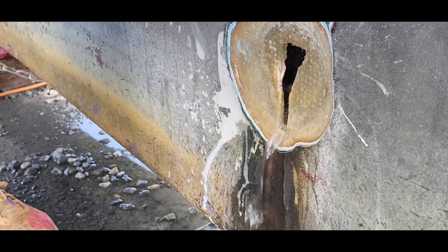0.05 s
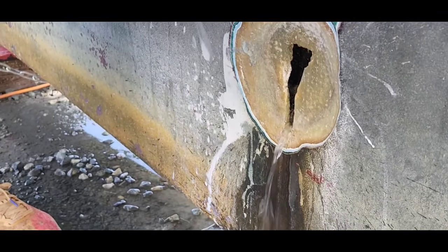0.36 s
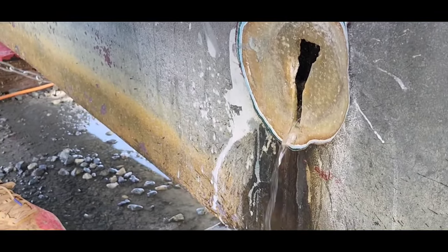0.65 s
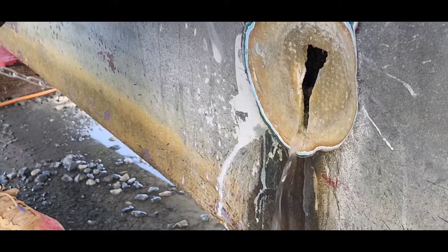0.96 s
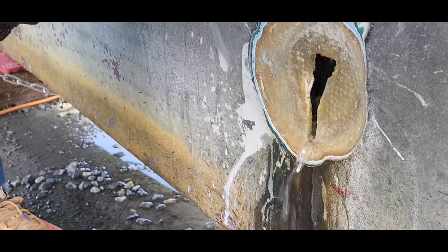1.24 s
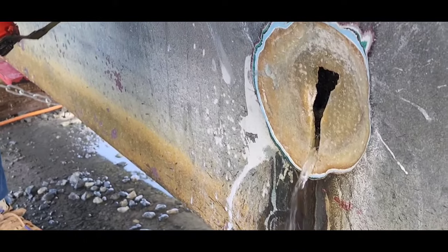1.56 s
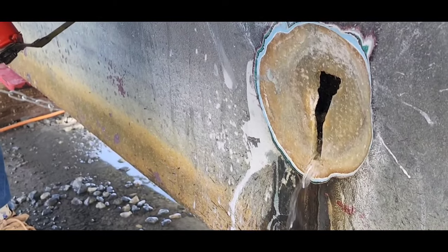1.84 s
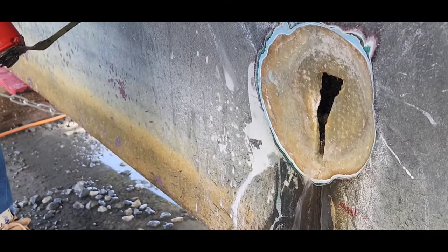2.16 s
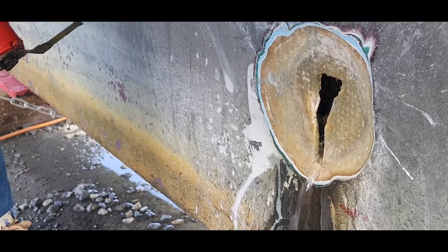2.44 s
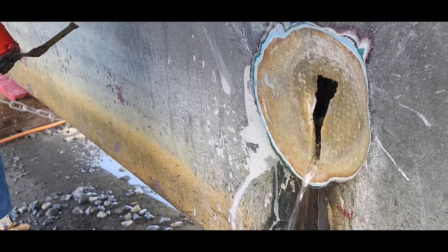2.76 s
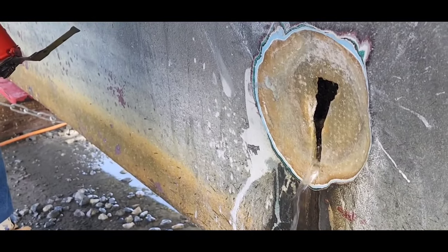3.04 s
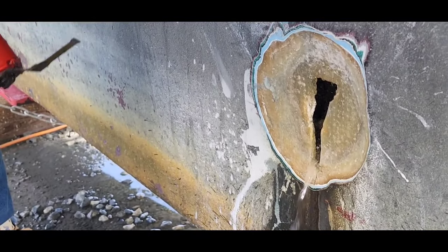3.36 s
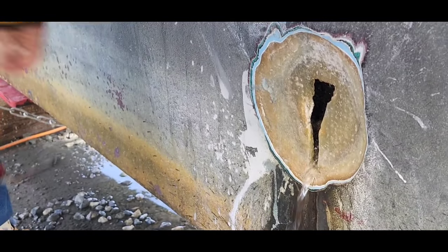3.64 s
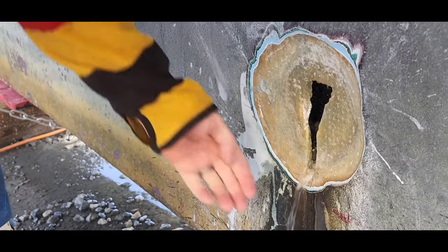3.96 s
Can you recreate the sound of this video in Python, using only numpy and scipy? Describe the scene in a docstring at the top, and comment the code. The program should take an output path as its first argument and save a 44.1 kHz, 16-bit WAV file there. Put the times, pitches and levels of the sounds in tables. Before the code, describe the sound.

Close up and outdoors, water drips in quick, uneven ticks onto gravel, some drops smacking on stone or plinking in a puddle. Behind it runs a steady machine hum and rumble, with a soft thump and faint sleeve rustle late.

```python
"""Keel water on wet gravel

Outdoors, water trickles from a hole in a boat's keel and spatters on wet gravel. Each drop bursts
into spray and a few tiny ringing bubbles; heavy ones smack on stone, others plink in a puddle.
Behind it a machine hums steadily over a low, uneven rumble and faint air.
Near the end come one soft low bump and the brush of a sleeve."""
import sys
import numpy as np
from scipy import signal
from scipy.io import wavfile
from scipy.ndimage import uniform_filter1d

SR = 44100
rng = np.random.default_rng(int(sys.argv[2]) if len(sys.argv) > 2 else 0)


def wav_out(sig):
    """Save sig, one row per channel (or a flat mono array), as 16-bit PCM at SR to the path in sys.argv[1]."""
    wavfile.write(sys.argv[1], SR, np.round(np.clip(np.atleast_2d(sig).T, -1, 1) * 32767).astype(np.int16))


N = 176400

# Swell of the rumble: time_s, level_db
RUMBLE_SWELL = [(0, -49), (.6, -46.5), (1.1, -47), (1.7, -45.5), (2.3, -45.5), (3, -40), (3.3, -44.5),
                (4, -40)]
# Tone of the rumble: frequency_hz, gain_db
RUMBLE_EQ = [(15, -5.5), (30, -17), (52, 4), (85, -1.5), (125, -5), (180, -21), (300, -35), (800, -56)]
# Tone of the outdoor air: frequency_hz, gain_db
AIR_EQ = [(200, 0), (450, -2.5), (800, -5.5), (1100, -12), (2500, -24.5), (16000, -39)]
# Harmonics of the machine's pulse rate, from the first up: gain_db
HUM_HARMONICS = [-3, 1, -6, -13, -10.5, -12.5, -9.5, -12.5, -15.5, 0.5, -5.5, -9.5, -17.5, -14.5, -21]
# Fade-in of the sleeve: time_s, level_db
SLEEVE_FADE = [(3.5, -81), (3.63, -57.5), (4, -54.5)]
# Tone of the brushing cloth: frequency_hz, gain_db
SLEEVE_EQ = [(700, -13), (2400, -3.5), (7000, -18)]
# Flow of the trickle between the large drops: time_s, level_db
TRICKLE_FLOW = [(0, -53), (.6, -53.5), (1.3, -51.5), (1.56, -54), (2.05, -57.5), (3.0, -53.5), (3.55, -56),
                (3.7, -53.5), (4, -55)]
# Tone of the trickle's wash: frequency_hz, gain_db
WASH_EQ = [(700, -13.5), (1200, 2.5), (1550, 7), (1900, 0.5), (3300, 2), (4500, -2.5), (5700, 6.5),
           (7200, 0), (9300, -16), (12000, -8.5), (15500, -2.5)]
# Drops into the puddle: start_s, level_db, pitch_hz
PUDDLE_DROPS = [(0.136, -51, 3520), (0.3755, -49.5, 1584), (.413, -49, 1660), (0.586, -41, 1625),
                (0.613, -52, 1640), (0.729, -50.5, 1526), (0.78, -47.5, 1530), (1.092, -42.5, 1550),
                (1.265, -50, 1210), (1.273, -37, 2865), (1.302, -49, 1660), (2.143, -55, 1550),
                (2.784, -57, 1543), (2.891, -50.5, 1544), (2.923, -52, 1550), (3.042, -46, 1360),
                (3.176, -54, 1495), (3.361, -54.5, 1540), (3.601, -52, 1540), (3.656, -48, 1520),
                (3.677, -37, 1514)]
# Heavy drops on stone: start_s, level_db, high_cut_hz
STONE_DROPS = [(0.264, -44, 5300), (0.584, -40.5, 4320), (0.7433, -35, 6000), (0.9058, -38.5, 7000),
               (1.2629, -35, 3170), (1.2733, -42, 3300), (1.975, -48, 3000), (2.367, -38.5, 6200),
               (2.4925, -48, 2170), (2.6436, -35, 6400), (3.0452, -36, 4070)]
# A sharp smack with two quick echoes off the ground and hull: delay_s, gain_db
SMACK_ARRIVALS = [(0, -0.5), (.0038, -0.5), (.0063, -7)]
# Tone of the spray: frequency_hz, gain_db
SPRAY_EQ = [(300, -5), (900, -3.5), (1600, -4), (2300, 2), (4000, 4.5), (6500, 11.5), (9500, 1), (12500, 9),
            (15500, 4.5)]
# Large drops on gravel: start_s, bubbles_db, bubble_pitch_hz, spray_db
GRAVEL_DROPS = [(0.0389, -41, 5120, -65), (0.3408, -42, 2930, -52), (0.364, -63, 6000, -47),
                (0.399, -41, 6200, -51.5), (0.5434, -42.5, 2590, -51), (0.5537, -39, 7400, -67),
                (0.583, -42.5, 3700, -71), (0.6458, -44, 6970, -50), (0.6833, -40.5, 4920, -50),
                (0.7205, -37.5, 6280, -46), (0.744, -36, 5000, -48), (0.7725, -43, 6800, -47.5),
                (0.782, -43.5, 3600, -51), (0.796, -42.5, 6400, -47), (0.841, -45, 6300, -49),
                (0.904, -32, 5640, -44.5), (0.9921, -42, 6360, -44), (1.0051, -36.5, 6400, -42),
                (1.0592, -41.5, 4180, -48), (1.1314, -41, 6540, -56), (1.2181, -53, 5600, -46.5),
                (1.233, -41.5, 3040, -45), (1.2729, -35.5, 2740, -41.5), (1.3027, -37, 6360, -59),
                (1.3616, -41.5, 6070, -55), (1.3901, -44, 6150, -47.5), (1.41, -44, 7000, -44),
                (1.4264, -38, 5420, -47), (1.832, -43.5, 5940, -52.5), (1.9371, -51.5, 3630, -49),
                (1.9508, -37.5, 6840, -41), (2.1121, -37, 5780, -50.5), (2.1302, -40.5, 4050, -46),
                (2.1697, -42.5, 6350, -44.5), (2.2697, -46, 6360, -49), (2.3134, -38, 5640, -74),
                (2.5729, -46, 6850, -48.5), (2.6112, -45, 6170, -53), (2.6527, -36, 6380, -71),
                (2.8424, -41.5, 4630, -46), (2.853, -47, 6960, -44), (3.2286, -41.5, 6600, -48.5),
                (3.4005, -37.5, 6230, -46), (3.4752, -42, 7700, -59), (3.77, -44, 4870, -55)]

SPLAT_RISE_S, SPLAT_HOLD_UNTIL_S, SPLAT_DECAY_S = .003, .0075, .0032
WATER_PAN_DB = -5  # negative leans right


def amp(db):
    """Decibels to gain."""
    return 10 ** (np.asarray(db) / 20)


def unit(x):
    """Scales to rms 1."""
    return x / np.sqrt(np.mean(x ** 2) + 1e-20)


def match_energy(x, reference):
    """Scales x to carry the energy of the reference."""
    return x * np.linalg.norm(reference) / np.linalg.norm(x)


def pan(db):
    """Stereo gains: left up by db, right down by as much."""
    return amp(db * np.array([[1], [-1]]))


def fader(points):
    """Gain over time through (time_s, level_db) points."""
    return amp(np.interp(np.arange(N) / SR, *np.transpose(points)))


def drift(first_window, second_window):
    """Random modulation: noise smoothed twice, windows in samples."""
    return unit(uniform_filter1d(uniform_filter1d(rng.standard_normal(N), first_window), second_window))


def add(mix, start_s, sound):
    """Mixes a sound in at its start time."""
    part = mix[..., max(round(start_s * SR), 0):][..., :sound.shape[-1]]
    part += sound[..., :part.shape[-1]]


def equalise(x, eq):
    """Minimum-phase EQ through (frequency_hz, gain_db) points."""
    points_hz, db = np.transpose(eq)
    hz = abs(np.fft.fftfreq(8192, 1 / SR))
    log_gain = np.log(amp(np.interp(np.log(hz + 1), np.log(points_hz), db)))
    kernel = np.fft.ifft(np.exp(np.conj(signal.hilbert(log_gain)))).real
    return signal.oaconvolve(x, kernel[:len(hz) // 2])[:len(x)]


def stereo_noise(eq, correlation):
    """Coloured noise, partly shared between left and right."""
    left, other = (unit(equalise(white, eq)) for white in rng.standard_normal((2, N)))
    return np.array([left, correlation * left + np.sqrt(1 - correlation ** 2) * other])


def rumble_and_air(air_db=-57.5):
    """The bed: a low rumble that leans left as it swells, and faint outdoor air."""
    swell = fader(RUMBLE_SWELL)
    rumble = swell * stereo_noise(RUMBLE_EQ, correlation=.8) * pan(0.9 * unit(swell) ** 2)
    return rumble + amp(air_db) * stereo_noise(AIR_EQ, correlation=.46)


def thump(peak_s=3.405, level_db=-29.5, pitch_hz=118, fade_s=.006):
    """One soft low bump in the rumble."""
    t = np.arange(N) / SR - peak_s
    return amp(level_db) * np.exp(-abs(t) / fade_s) * np.sin(2 * np.pi * pitch_hz * t)


def machine(pulse_hz=56.43, level_db=-49.5, waver=.0015, smear=.34):
    """Steady pulses ring a low resonance; scattered harmonic phases smear each pulse."""
    turns = np.cumsum(pulse_hz * (1 + waver * drift(SR // 8, SR // 8))) / SR
    harmonics = np.arange(1, len(HUM_HARMONICS) + 1)
    phases = smear * (harmonics - 3) * rng.standard_normal(len(harmonics))
    hum = sum(amp(db) * np.cos(2 * np.pi * k * turns + phase)
              for k, db, phase in zip(harmonics, HUM_HARMONICS, phases))
    return amp(level_db) * pan(-1.74) * unit(hum)


def sleeve():
    """A sleeve brushes past in a soft, wide hiss."""
    return fader(SLEEVE_FADE) * stereo_noise(SLEEVE_EQ, correlation=.11)


def beside_hull(drop, pan_db, scatter_db=4, tail_db=-1):
    """Places a drop: its direct sound arrives on the left first; gravel and hull scatter it."""
    left_lead_s, scatter_s, tail_s = .000218, .00067, .026
    t = np.arange(SR // 10) / SR
    decays = np.exp(-t / np.array([[scatter_s], [tail_s]])) * (t > left_lead_s)
    sides = []
    for delay_s in (0, left_lead_s):
        scatter, tail = rng.standard_normal((2, len(t))) * decays
        path = np.sinc((t - delay_s) * SR)
        path += amp(scatter_db) * scatter / np.linalg.norm(scatter)
        path += amp(tail_db) * tail / np.linalg.norm(tail)
        sides.append(match_energy(signal.fftconvolve(drop, path), drop))
    return pan(pan_db) * np.array(sides)


def splat_envelope():
    """A drop spreads over the stones: quick attack, short hold, decay."""
    t = np.arange(SR // 20) / SR
    return np.minimum(t / SPLAT_RISE_S, 1) * np.exp(-np.maximum(t - SPLAT_HOLD_UNTIL_S, 0) / SPLAT_DECAY_S)


def crackle(size, grain_db=4):
    """Dense tiny impacts of uneven strength."""
    return unit(rng.standard_normal(size) * amp(grain_db * np.minimum(rng.exponential(1, size), 2)))


def bubbles(centre_hz, count, spread=.13, climb=.18, typical_hz=6000, lowest_hz=1180):
    """A cluster of tiny, briefly ringing bubbles; later ones tend higher, and deep clusters vary more."""
    envelope = splat_envelope()
    t, cluster = np.arange(len(envelope)) / SR, np.zeros(len(envelope))
    for lateness, detune in zip(rng.random(count), rng.standard_normal(count)):
        hz = centre_hz * np.exp(spread * np.sqrt(typical_hz / centre_hz) * detune + climb * (lateness - .5))
        hz = max(hz, lowest_hz * (1 + lateness))
        decay_s = 9.7 / np.sqrt(hz * typical_hz)  # 9.7 cycles at the typical pitch
        ring = np.sin(2 * np.pi * hz * t) * np.exp(-t / decay_s)
        add(cluster, lateness * SPLAT_HOLD_UNTIL_S, np.exp(-detune ** 2 / 2) * ring)
    return match_energy(cluster, envelope)


def trickle(droplets_per_s=58, centre_hz=5444, pitch_spread=.34, flicker_db=2.5):
    """Small droplets land at random over the thin, flickering wash of running water."""
    flow, count = fader(TRICKLE_FLOW), int(droplets_per_s * N / SR)
    flicker = amp(flicker_db * drift(SR // 50, SR // 100))
    wash = flow * flicker * stereo_noise(WASH_EQ, correlation=.04) * pan(WATER_PAN_DB / 2)
    droplets = []
    for when, size, pitch, wetness in rng.uniform(-1, 1, (count, 4)):
        start = int((when + 1) / 2 * (N - 1))
        bubbles_db = 20 * np.log10(flow[start]) + 6 * size
        spray_db = bubbles_db - 6 + 3 * wetness
        droplets.append((start / SR, bubbles_db, centre_hz * np.exp(pitch_spread * pitch), spray_db))
    return wash + splats(droplets, bubble_count=3)


def plinks(rise_cycles=10.5, decay_cycles=6.7, glide_per_s=.8, boost_db=8.5, splash_db=-54):
    """With a soft splash in the puddle, a larger bubble swells, rings and bends slightly up in pitch."""
    t, out = np.arange(SR // 20) / SR, np.zeros((2, N))
    for start_s, level_db, hz in PUDDLE_DROPS:
        rise_s, decay_s = rise_cycles / hz, decay_cycles / hz
        envelope = np.minimum(t / rise_s, 1) ** .5 * np.exp(-np.maximum(t - rise_s, 0) / decay_s)
        turns = np.cumsum(hz * (1 + glide_per_s * (t - rise_s))) / SR
        ring = amp(level_db + boost_db) * envelope * np.sin(2 * np.pi * turns)
        splash = amp(splash_db) * bubbles(hz, count=8)
        add(out, start_s, beside_hull(ring + splash, pan_db=-4, scatter_db=-6, tail_db=-18))
    return out


def smacks(low_cut_hz=1330, click_decay_s=.0002):
    """A heavy drop smacks sharply on stone, with two quick echoes off the ground and hull."""
    t, out = np.arange(SR // 40) / SR, np.zeros((2, N))
    for start_s, level_db, high_cut_hz in STONE_DROPS:
        arrivals = np.zeros(len(t))
        for delay_s, gain_db in SMACK_ARRIVALS:
            click = (t == 0) + .5 * np.exp(-t / click_decay_s) * rng.standard_normal(len(t))
            add(arrivals, delay_s, amp(gain_db) * unit(click))
        band = signal.butter(3, [low_cut_hz, high_cut_hz], "bandpass", fs=SR, output="sos")
        crack = amp(level_db) * match_energy(signal.sosfilt(band, arrivals), splat_envelope())
        add(out, start_s, beside_hull(crack, pan_db=-1, scatter_db=5, tail_db=-7))
    return out


def splats(drops, bubble_count, spray_trim_db=3, bubbles_trim_db=-.5):
    """Each drop bursts on the gravel into bright spray with bubbles ringing in it."""
    spray, rings, envelope = np.zeros((2, N)), np.zeros((2, N)), splat_envelope()
    for start_s, bubbles_db, hz, spray_db in drops:
        burst = amp(spray_db) * envelope * crackle(len(envelope))
        add(spray, start_s, beside_hull(burst, pan_db=0))
        cluster = amp(bubbles_db) * bubbles(hz, bubble_count)
        add(rings, start_s, beside_hull(cluster, pan_db=WATER_PAN_DB))
    bright_spray = np.array([equalise(side, SPRAY_EQ) for side in spray])
    return amp(spray_trim_db) * bright_spray + amp(bubbles_trim_db) * rings


def scene():
    """Machine and rumble behind, a sleeve at the end, water up front."""
    backdrop = machine() + rumble_and_air() + thump() + sleeve()
    return backdrop + splats(GRAVEL_DROPS, bubble_count=14) + smacks() + plinks() + trickle()


def record(dry):
    """A steep high cut at 16 kHz on the whole mix."""
    high_cut = signal.firwin(511, 16000, window=("kaiser", 9), fs=SR)
    return signal.oaconvolve(dry, high_cut[None], "same")


dry = scene()
out = record(dry)
wav_out(out)
```